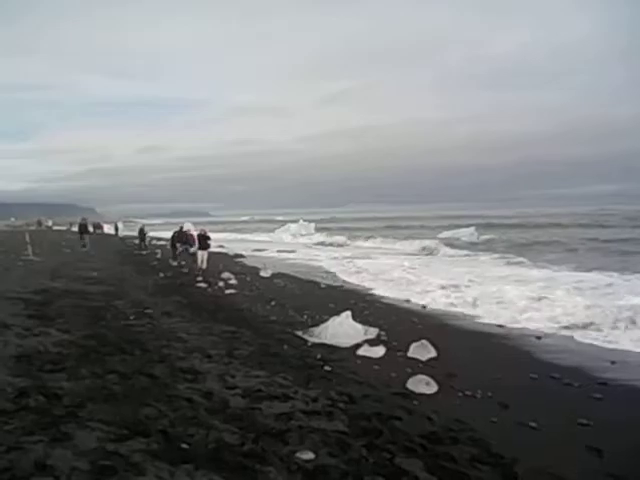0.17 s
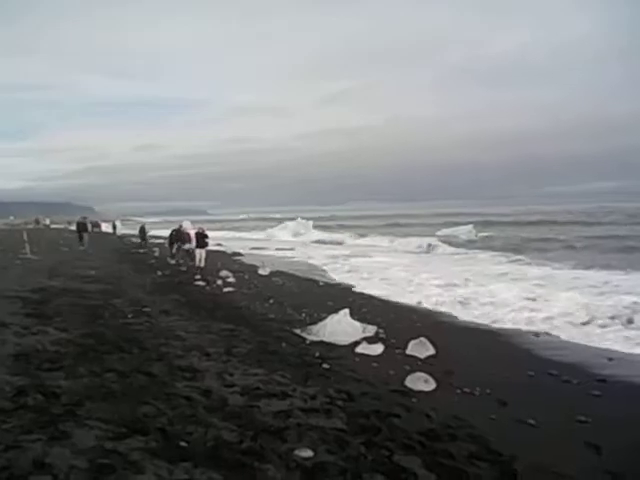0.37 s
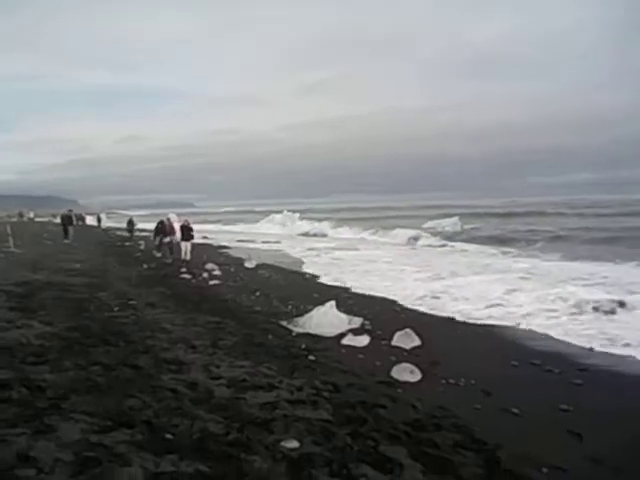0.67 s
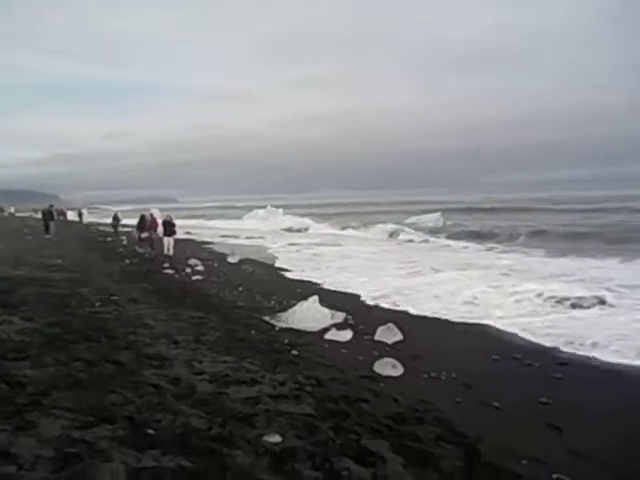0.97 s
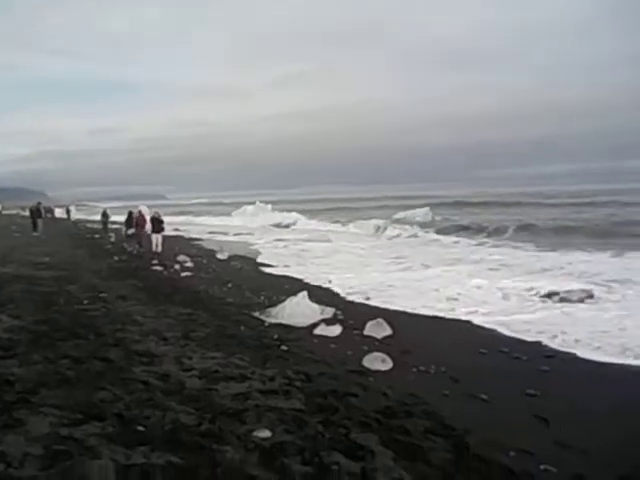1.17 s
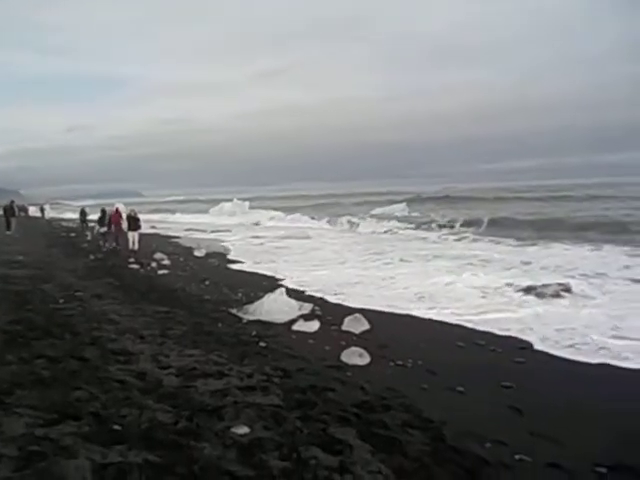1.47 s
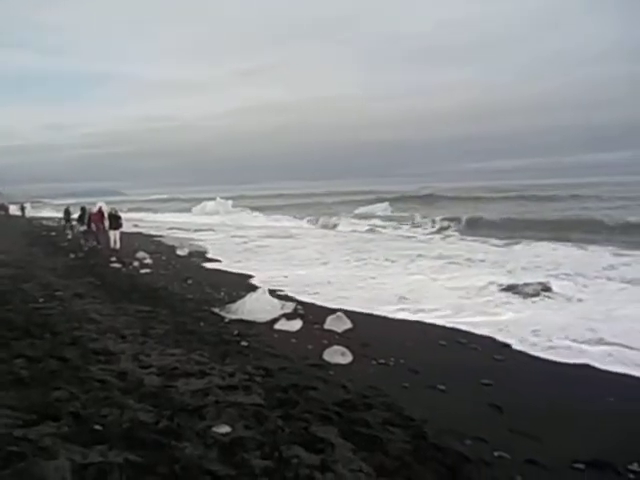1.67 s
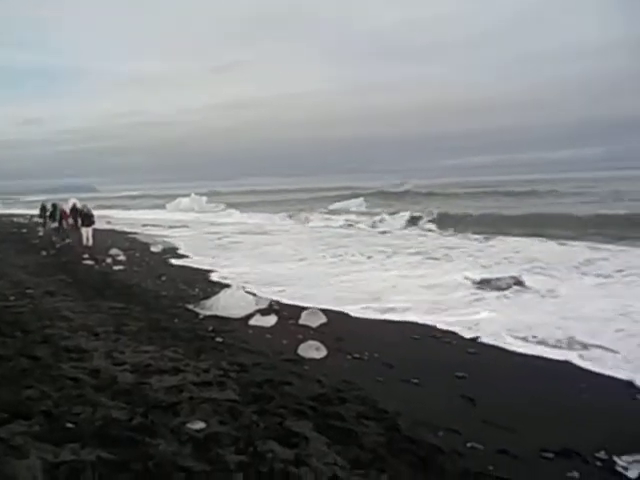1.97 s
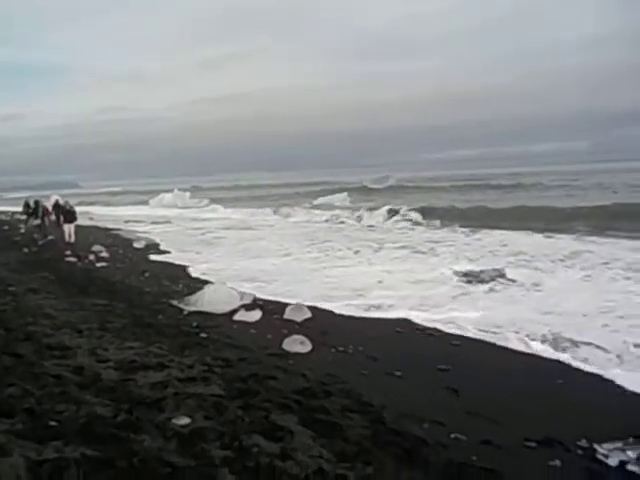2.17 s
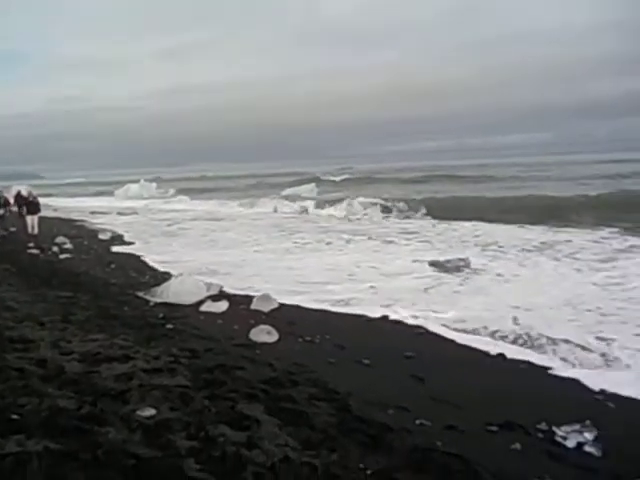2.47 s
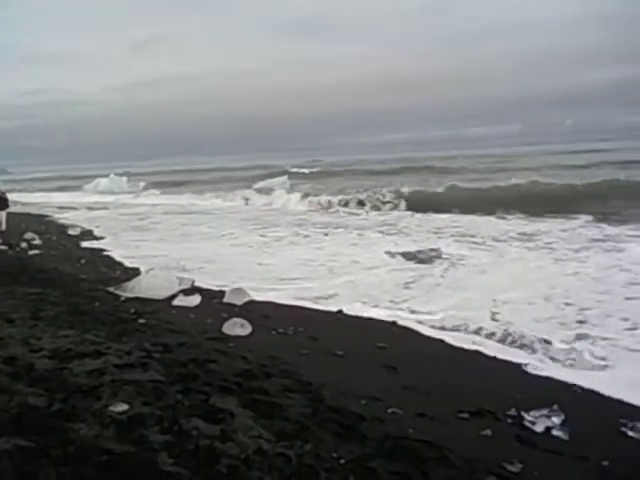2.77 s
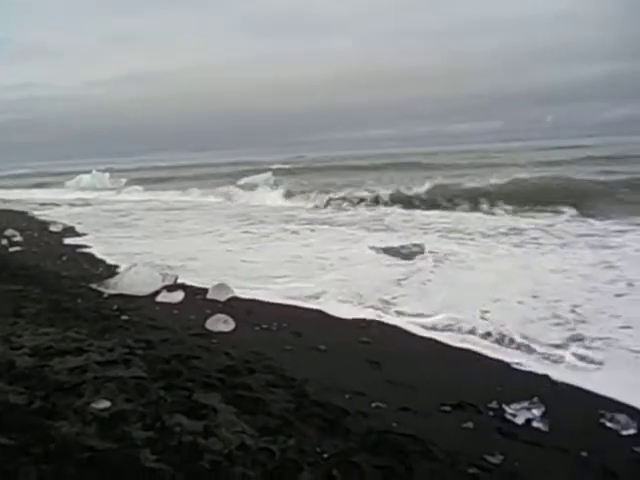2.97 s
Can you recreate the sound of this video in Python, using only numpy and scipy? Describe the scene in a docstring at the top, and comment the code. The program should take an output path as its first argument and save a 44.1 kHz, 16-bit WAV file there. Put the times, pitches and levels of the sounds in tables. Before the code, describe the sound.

Surf on an open beach, from a few metres up the shore. Near silence, then a rapid fade-in by 0.25 s to a dense mid-range roar of breakers, wavering slightly. Foam fizzes with tiny bubble bursts and crisp water slaps throughout. Low rumble eases away; the roar dips slightly towards 2.9 s, then a brighter splash swells at 3 s. Small stereo camera sound, weak bass, faint steady hiss.

```python
"""A sand beach, a few metres up the shore: surf heard through a small stereo camera.
Breakers roar in the mid range, as modulated noise with the damped rings of large bubbles.
Foam washes up the sand with small bubbles bursting; crests splash, drops slap, a low rumble lies beneath.
All are noise or impulses shaped by a spectrum and blended by the likeness of two microphone ports.
The camera fades in, cuts three narrow notches, and leaves a gap between the surf and a thin top hiss."""
import sys
import numpy as np
from scipy import signal
from scipy.fft import rfft, irfft
from scipy.io import wavfile
from scipy.ndimage import uniform_filter1d

SR = 44100
rng = np.random.default_rng(int(sys.argv[2]) if len(sys.argv) > 2 else 0)


def materialize(psi):
    """Save the field psi as 16-bit PCM at rate SR to the path in sys.argv[1].

    A 1-D psi becomes a single channel; in a 2-D psi each row is a channel.
    """
    bounded = np.clip(np.atleast_2d(psi).T, -1, 1)
    quanta = np.round(bounded * 32767).astype(np.int16)
    wavfile.write(sys.argv[1], SR, quanta)


N = 137151  # length in samples

# Level curves, before the gains of each source and the fade: (time [s], level [dB])
# roar of the breakers
ROAR_LEVEL = [(0.27, -35), (0.45, -37), (0.58, -35.5), (0.68, -35), (0.78, -37), (0.92, -36.5),
              (1.12, -38.5), (1.3, -34), (1.41, -37.5), (1.52, -35), (1.68, -35.5), (1.86, -37),
              (2.1, -35.5), (2.26, -39), (2.36, -37), (2.65, -38), (2.9, -40), (3.09, -37.5)]
# foam wash, also the reference for the spatter: (time [s], level [dB])
WASH_LEVEL = [(0.27, -42.5), (0.5, -45), (0.8, -45), (1.0, -45.5), (1.2, -44), (1.6, -45), (2.0, -46),
              (2.27, -46.5), (2.36, -45), (2.5, -45.5), (2.8, -45.5), (3.08, -44.5)]
# splash of collapsing crests: (time [s], level [dB])
SPLASH_LEVEL = [(0.25, -42.5), (0.5, -41.5), (0.95, -44.5), (1.5, -48), (2.2, -46.5), (2.8, -43.5),
                (2.95, -45.5), (3.07, -36)]
# low rumble of the surf: (time [s], level [dB])
RUMBLE_LEVEL = [(0.2, -45), (0.62, -52.5), (1.0, -54.5), (1.45, -52.5), (2.2, -55), (2.9, -58.5)]
# thin top hiss: (time [s], level [dB])
HISS_LEVEL = [(0.25, -63.5), (1.0, -63.5), (3.1, -62.3)]
# camera fade-in, applied to the whole mix: (time [s], level [dB])
FADE_LEVEL = [(0.068, -100), (0.074, -38.5), (0.12, -27), (0.16, -15.5), (0.2, -7), (0.245, 2)]

# Spectral weightings, relative because each result is rescaled: (frequency [Hz], gain [dB])
# roar and the large bubbles in it
ROAR_COLOUR = [(20, -56), (40, -52), (65, -48), (100, -34), (150, -22), (200, -34.5), (300, -12.5),
               (450, -0.7), (650, 0.5), (1000, -0.87), (1400, -5.5), (2000, -13.5), (3000, -25.5),
               (7000, -49.5)]
# foam wash and the small bubbles in it: (frequency [Hz], gain [dB])
WASH_COLOUR = [(100, -50.5), (500, -10), (1200, 0.5), (2200, -3), (2800, 1), (3500, -5), (4300, -12.5),
               (4800, -9.5), (5300, -5.5), (5900, -9.5), (6500, -16.5), (6950, -29), (7300, -47)]
# crest splash: (frequency [Hz], gain [dB])
SPLASH_COLOUR = [(200, -40), (700, -2), (1100, 3), (1450, 2.5), (2200, -4.5), (3200, -12), (6000, -36.5)]
# slaps of falling water: (frequency [Hz], gain [dB])
SPATTER_COLOUR = [(150, -32), (500, -2), (1100, 2), (2000, 1), (3000, -2), (4300, -7), (5400, -11),
                  (6500, -32), (7300, -42)]
# low rumble: (frequency [Hz], gain [dB])
RUMBLE_COLOUR = [(20, -50), (40, -39), (65, -32), (100, -20), (150, -8.5), (250, 2), (350, 0.5), (600, -3),
                 (1500, -43)]
# top hiss: (frequency [Hz], gain [dB])
HISS_COLOUR = [(8300, -31), (8700, -7), (9200, -1.5), (10500, 1.5), (13500, 2.5), (15000, 3), (16000, -1.5)]

# likeness of the two microphone ports: (frequency [Hz], coherence [0-1])
PORT_LIKENESS = [(60, .997), (120, .9995), (350, .9994), (600, .998), (900, .994), (1400, .96), (1900, .86),
                 (2250, .96), (3000, .94), (4100, .78), (5300, .9), (6600, .64), (9500, .48), (14000, .48),
                 (15500, .2)]
# phase by which the left port leads: (frequency [Hz], phase [rad])
LEFT_LEAD = [(400, 0), (1000, -.06), (1500, -.22), (1900, -.36), (3300, -.1), (4600, .3), (5300, -.65),
             (6000, -.95), (7000, -.2), (9300, -.8), (10500, -1.7), (13000, -2.5), (15500, -2.6)]
# left minus right level: (frequency [Hz], difference [dB])
PORT_BALANCE = [(850, 0), (1550, 1.2), (1950, .3), (2150, -1.5), (2500, -2), (2750, -4.7), (3300, -1.5),
                (4150, -4), (4800, 2.5), (5250, 2.5), (5800, -.7), (6600, -3), (9000, .2)]
# camera notch filters: (centre [Hz], width [Hz])
NOTCHES = [(1767, 195), (2545, 280), (4990, 160)]
GAP_HZ, EDGE_HZ = (7080, 8480), 15750  # silent band in the treble, upper band limit

# unevenness of roar and foam [dB rms]; the sign is immaterial, as the drift is symmetric
SURGE_DB, FLUTTER_DB, PATCH_DB = 0.05, 0.2, 0.9
FOAM_SURGE_DB, FOAM_FLUTTER_DB, FOAM_PATCH_DB = 0.18, -0.1, 0.75
# showers, per port before blending: rate [1/s], level [dB], cycles to decay by exp(-2)
PLOPS_PER_S, PLOP_DB, PLOP_CYCLES = 700, -11, 3.4  # large bubbles, re the roar level curve
POPS_PER_S, POP_DB, POP_CYCLES = 2500, -11.5, 2.3  # small bubbles, re the wash noise
SPATTER_PER_S, SPATTER_DB, SPATTER_SPREAD_DB = 90, -9.5, 4  # slaps, re the wash level curve


def amp(db):
    """Decibel law: amplitude gain is 10 to the power dB / 20."""
    return 10 ** (np.asarray(db) / 20)


def unit(x):
    """Normalisation to unit mean power."""
    return x / np.sqrt(np.mean(x ** 2) + 1e-20)


def at_hz(points, hz):
    """Linear interpolation on a logarithmic frequency axis."""
    f, value = np.transpose(points)
    return np.interp(np.log(hz + 1), np.log(f + 1), value)


def level(points):
    """Amplitude envelope: a level curve interpolated in decibels at every sample."""
    times, db = np.transpose(points)
    return amp(np.interp(np.arange(N) / SR, times, db))


def drift(shape, size, order=1):
    """Slow random modulation: noise averaged over size frames and order bins, rms 1."""
    field = uniform_filter1d(rng.standard_normal(shape), size, 0)
    return unit(uniform_filter1d(field, order, 1))


def ports(pair, colour):
    """Partial coherence: two unrelated signals are coloured and blended into two ports; mid rms 1."""
    a, b = rfft(pair, 2 * N)
    hz = np.fft.rfftfreq(2 * N, 1 / SR)
    same = np.clip(at_hz(PORT_LIKENESS, hz), 0, 1)
    tilt = amp(at_hz(PORT_BALANCE, hz) / 2)  # half the difference on each side
    blend = same * a + np.sqrt(1 - same ** 2) * b
    right = blend * np.exp(-1j * at_hz(LEFT_LEAD, hz))
    spectra = np.array([a * tilt, right / tilt]) * amp(at_hz(colour, hz))
    out = irfft(spectra)[:, :N]
    return out / np.std(out.mean(0))


def churn(surge_db, flutter_db, patch_db):
    """Modulated turbulence: two noises share slow surges, quick flutter and time-pitch patches."""
    z = signal.stft(rng.standard_normal((2, N)), nperseg=512, noverlap=384)[2]
    bins, frames = z.shape[1:]
    field = surge_db * drift((frames, 1), size=36)
    field = field + flutter_db * drift((frames, 1), size=7)
    field = field + patch_db * drift((frames, bins), size=12, order=6)
    return signal.istft(z * amp(field.T), nperseg=512, noverlap=384)[1][:, :N]


def bubbles(per_s, low_hz, high_hz, cycles, spread_db, count=28):
    """Damped oscillation: random impulses set off short decaying sines of many pitches and sizes."""
    t = np.arange(1024) / SR
    out = np.zeros((2, N))
    for hz in np.geomspace(low_hz, high_hz, count):
        size = amp(spread_db * np.minimum(rng.exponential(1, (2, N)), 4))
        onsets = rng.random((2, N)) < per_s / count / SR
        ring = hz * np.sin(2 * np.pi * hz * t) * np.exp(-2 * hz * t / cycles)
        out += signal.oaconvolve(size * onsets, ring[None], axes=1)[:, :N]
    return unit(out)


def breakers():
    """Broadband turbulence of tumbling white water, with resonant large bubbles plopping in it."""
    plops = bubbles(PLOPS_PER_S, low_hz=350.5, high_hz=1900, cycles=PLOP_CYCLES, spread_db=3.5)
    roar = ports(churn(SURGE_DB, FLUTTER_DB, PATCH_DB), ROAR_COLOUR)
    return level(ROAR_LEVEL) * (amp(-2.29) * roar + amp(PLOP_DB) * ports(plops, ROAR_COLOUR))


def foam():
    """Superposed small sources: foam running over sand, as noise and the rings of bursting bubbles."""
    pops = bubbles(POPS_PER_S, low_hz=1326, high_hz=6750, cycles=POP_CYCLES, spread_db=3.5)
    wash = ports(churn(FOAM_SURGE_DB, FOAM_FLUTTER_DB, FOAM_PATCH_DB), WASH_COLOUR)
    return amp(2) * level(WASH_LEVEL) * (wash + amp(POP_DB) * ports(pops, WASH_COLOUR))


def crests():
    """Strongly modulated turbulence: the brighter splash of waves that fold over."""
    return level(SPLASH_LEVEL) * ports(churn(surge_db=-0.8, flutter_db=2.0, patch_db=2.0), SPLASH_COLOUR)


def spatter():
    """Impulsive excitation: separate crisp slaps of water on water, of random sign and size."""
    size = amp(SPATTER_SPREAD_DB * np.minimum(rng.exponential(1, (2, N)), 3))
    sign = rng.choice([-1, 1], (2, N))
    onsets = rng.random((2, N)) < SPATTER_PER_S / SR
    return amp(SPATTER_DB) * level(WASH_LEVEL) * ports(size * sign * onsets, SPATTER_COLOUR)


def rumble():
    """Low-frequency turbulence: the weight of water under the roar, easing as the wave runs out."""
    return level(RUMBLE_LEVEL) * ports(churn(surge_db=1.7, flutter_db=-1.2, patch_db=1.65), RUMBLE_COLOUR)


def top_hiss():
    """Nearly stationary noise: a thin even hiss far above the surf."""
    return level(HISS_LEVEL) * ports(churn(surge_db=0.2, flutter_db=0.2, patch_db=0.0), HISS_COLOUR)


def scene():
    """Superposition: the pressures of all sources add."""
    return breakers() + foam() + crests() + spatter() + rumble() + top_hiss()


def record(dry):
    """Linear filtering in the camera: fade-in, three notches, the treble gap and the band limit."""
    x = dry * level(FADE_LEVEL)
    for hz, width in NOTCHES:
        b, a = signal.iirnotch(hz, hz / width, SR)
        x = signal.lfilter(b, a, x)
    # passes below the gap, and from the gap to the edge
    band = signal.firwin(1023, [*GAP_HZ, EDGE_HZ], window=("kaiser", 9), fs=SR)
    return signal.oaconvolve(x, band[None], "same", axes=1)


dry = scene()
out = record(dry)
materialize(out)
```